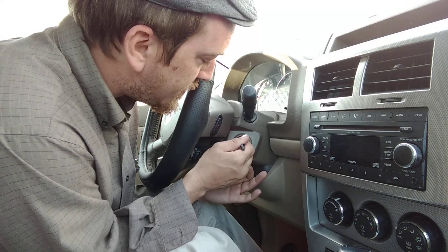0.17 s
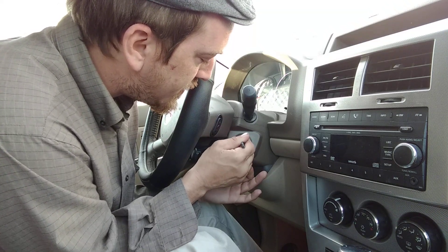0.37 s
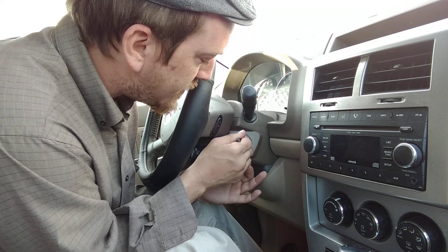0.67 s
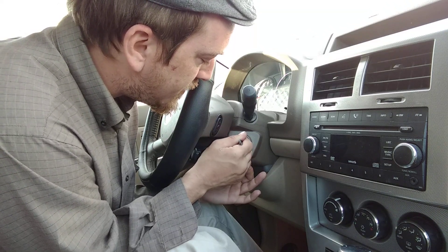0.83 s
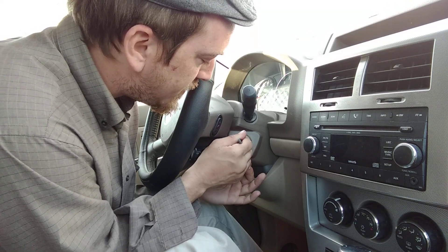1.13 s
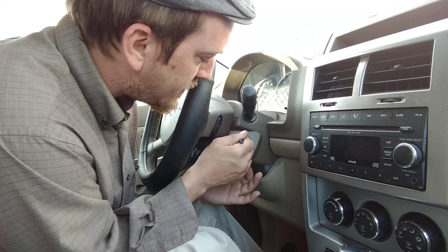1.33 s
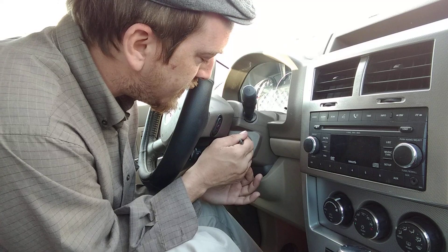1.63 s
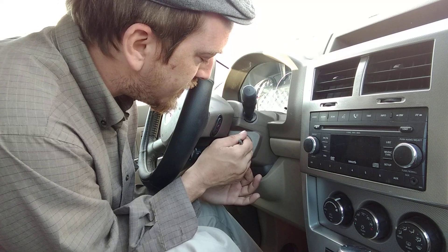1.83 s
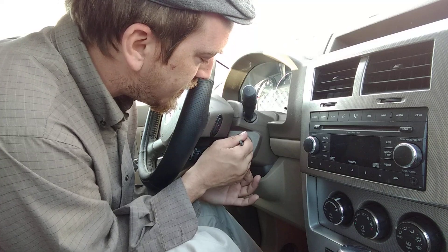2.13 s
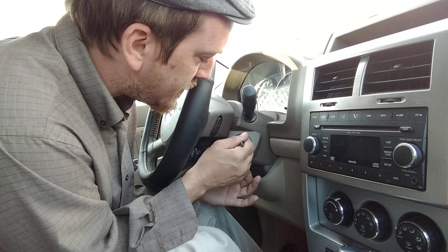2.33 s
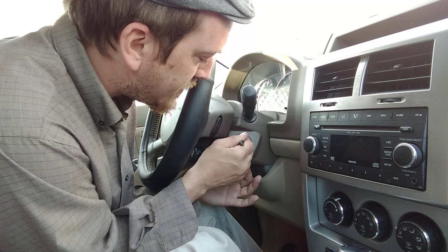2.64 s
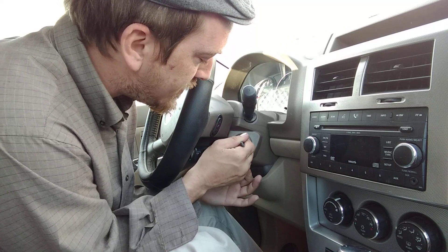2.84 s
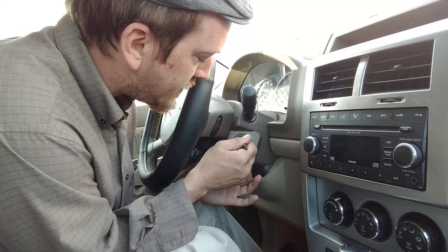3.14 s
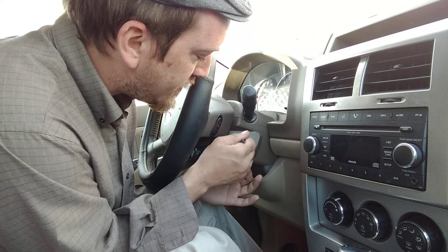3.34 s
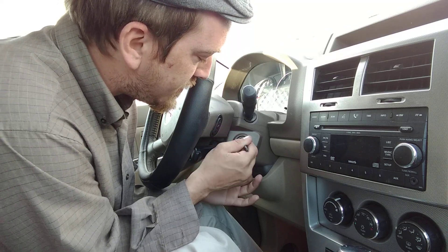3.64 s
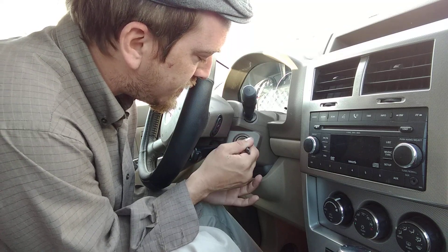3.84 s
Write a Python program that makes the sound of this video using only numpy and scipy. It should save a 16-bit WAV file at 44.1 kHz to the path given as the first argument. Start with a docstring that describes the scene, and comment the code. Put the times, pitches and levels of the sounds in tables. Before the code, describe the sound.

Lock picking: small irregular metallic clicks, ticks and faint scrapes in a quiet parked car

```python
"""In the padded cabin of a parked car, a pick works the lock cylinder on the steering column.
Sprung pins snap back, the thin pick ticks and scrapes on metal, the tension wrench knocks in the keyway:
noise cracks with a rebound and short cabin reflections, ringing through the damped modes of the lock.
The hands nudge the hollow column, whose low modes rumble as filtered noise, over a faint two-channel hiss.
The recorder widens the stereo image with a late, inverted feed between the channels."""
import sys
import numpy as np
from scipy import signal
from scipy.fft import rfft, irfft
from scipy.io import wavfile
from scipy.ndimage import uniform_filter1d

SR = 44100
rng = np.random.default_rng(int(sys.argv[2]) if len(sys.argv) > 2 else 0)


def store_wav(level_fs):
    """Save 16-bit WAV to argv[1]."""
    pcm = np.round(np.clip(np.atleast_2d(level_fs), -1, 1) * 32767)
    wavfile.write(sys.argv[1], SR, pcm.T.astype(np.int16))


N = 176400  # samples: 4 s
CLICK_SIZE = 8192  # samples in one contact with its tail

# colour of the pick on metal, for ticks and scrapes: f/Hz, relative level/dB
PICK_TONE = [(300, -5.5), (1100, -4), (2800, -11.5), (4000, -4), (5200, -8), (6500, 0), (8300, -5.5),
             (9600, -3.5), (11100, -5.5), (13000, 2), (15500, -3.5)]


def undb(db):
    """Turn dB into an amplitude factor."""
    return 10 ** (np.asarray(db) / 20)


def unit(x):
    """Scale to an energy of 1."""
    return x / np.sqrt(np.sum(x ** 2))


def fade(t, t60):
    """Exponential decay that falls 60 dB in t60 seconds."""
    return np.exp(-np.log(1000) * t / t60)


def colour(points, size):
    """Minimum-phase frequency response through (Hz, dB) points: it colours without ringing ahead."""
    hz, db = np.array(points, float).T
    f = np.maximum(np.fft.rfftfreq(size, 1 / SR), 1)
    gain = undb(np.interp(np.log(f), np.log(hz), db))
    # folding the cepstrum onto positive time makes the response causal
    cepstrum = irfft(np.log(gain), size)
    cepstrum[1:size // 2] *= 2
    cepstrum[size // 2 + 1:] = 0
    return np.exp(rfft(cepstrum))


def resonances(modes, size):
    """Summed frequency response of damped modes given as (Hz, t60 s, dB)."""
    f = np.maximum(np.fft.rfftfreq(size, 1 / SR), 1)
    response = 0
    for hz, t60, db in modes:
        q = np.pi * hz * t60 / np.log(1000)
        response = response + undb(db) / (1 + 1j * q * (f / hz - hz / f))
    return response


def noise(response):
    """Noise of rms 1 with the given response."""
    x = irfft(rfft(rng.standard_normal(N)) * response, N)
    return x / x.std()


def hiss():
    """Faint coloured noise with a slowly moving level, unrelated at the two microphones."""
    # spectrum of the hiss: f/Hz, relative density/dB
    hiss_tone = [(25, 6), (45, -1), (70, -3), (170, -1), (300, -7.5), (600, -11), (1300, -16), (2000, -19),
                 (4000, -23), (7000, -30.5), (9000, -34.5), (12000, -29.5), (15500, -24.5)]
    # rms level of the hiss over time: t/s, level/dB
    hiss_level = [(0, -59), (.2, -59), (.3, -58), (.7, -55.5), (.8, -59.5), (1.05, -58.5), (1.25, -55),
                  (1.42, -56.5), (1.5, -57), (1.7, -57), (1.9, -55.5), (2.5, -56), (3.1, -56), (3.7, -56),
                  (4, -56.5)]
    level = undb(np.interp(np.arange(N) / SR, *np.array(hiss_level).T))
    return level * np.array([noise(colour(hiss_tone, N)) for _ in range(2)])


def rumble(modes, rise_s, stretch):
    """Every nudge of the hands sets these modes rumbling for a moment; overlapping nudges add in power."""
    # hands nudging the column: t/s, level before trims/dB, decay time before stretch/s
    nudges = [(0.233, -50.5, 0.067), (.29, -52.5, 0.1), (0.513, -52.5, 0.036), (0.6, -51, 0.021),
              (0.693, -52, 0.02), (1.101, -60, 0.045), (1.242, -56.5, 0.071), (1.437, -55.5, 0.036),
              (1.589, -54.5, 0.027), (1.74, -48.5, 0.045), (1.89, -59, 0.15), (2.016, -51, 0.056),
              (2.185, -54.5, 0.048), (2.32, -57, 0.19), (2.4, -60, 0.023), (2.656, -46.5, 0.04),
              (3.117, -46, 0.086), (3.225, -52.5, 0.084), (3.406, -51, 0.056), (3.69, -58, 0.017),
              (3.811, -45, 0.052), (3.92, -57, 0.091)]
    nudge_trim_db = 6
    t = np.arange(N) / SR
    power = 0
    for start, db, decay in nudges:
        since = np.maximum(t - start, 0)
        swell = (1 - np.exp(-since / rise_s)) * np.exp(-since / (decay * stretch))
        power = power + (undb(db + nudge_trim_db) * swell) ** 2
    x = noise(resonances(modes, N))
    # level the noise over 25 ms so the nudges alone shape it
    running_power = uniform_filter1d(x ** 2, size=1100)
    return np.sqrt(power / running_power) * x


def column():
    """The hollow steering column: two deep modes swell later and last longer than the upper ones."""
    # resonances of the column, deep to high: f/Hz, t60/s, relative level/dB
    column_modes = [(58, 0.32, -13.5), (83.6, 0.25, -4), (131.6, 0.41, 5), (153.2, 0.28, 0),
                    (182.5, 0.39, 7), (348, 0.061, -14.5)]
    deep = rumble(column_modes[:2], rise_s=0.027, stretch=1.27)
    upper = rumble(column_modes[2:], rise_s=0.0034, stretch=0.65)
    return undb(-2.5) * deep + undb(1.5) * upper


def cabin_noise():
    """Dense reflections as noise of scattered strength, with a few strong ones standing out."""
    chatter_db = 5.5
    chance = rng.standard_normal((2, CLICK_SIZE))
    return unit(chance[0] * undb(chatter_db * np.clip(chance[1], -2, 2)))


def lock_ring(size):
    """Frequency response of the lock and its housing: metal modes that share one short decay."""
    # resonances of the lock: f/Hz, level over the broad response before each layer's trim/dB
    lock_modes = [(723, 6), (940, 2), (1075, -7.5), (1147, 7), (1220, 5), (1574, 3), (1711, 0.5),
                  (2375, 10), (2510, 3), (2628, 3), (3175, 5), (3544, -5), (3700, -3), (4300, 3),
                  (5336, -5), (6560, -6.5), (7376, -5), (9665, 0.5), (10480, 9), (11950, -4), (12874, -8),
                  (14446, 6), (15300, -4)]
    t60_s = 0.045
    return resonances([(hz, t60_s, db) for hz, db in lock_modes], size)


def crack():
    """Metal meets metal: a tiny noise burst and one weaker rebound, without their lows."""
    crack_s, rebound_s, rebound_db = 0.0007, 0.0012, -5.5
    t = np.arange(CLICK_SIZE) / SR
    since = np.maximum(t - rebound_s, 0)
    chance = rng.standard_normal((2, CLICK_SIZE))
    first = unit(chance[0] * t * np.exp(-2 * t / crack_s))
    rebound = unit(chance[1] * since * np.exp(-2 * since / crack_s))
    high_pass = signal.butter(1, 1700, "high", fs=SR, output="sos")
    return signal.sosfilt(high_pass, first + undb(rebound_db) * rebound)


def contact(crack_db, cabin):
    """A crack, then cabin reflections: the body holds while dashboard and wheel answer, treble dies first."""
    cabin_t60_s, treble_t60_s, rise_s = 0.068, 0.047, 0.002
    body_split_hz, treble_split_hz = 1400, 7500
    early_s, late_body_db = 0.0105, -6
    shared = 0.55  # share of the reflections' power that stays the same for every contact
    t = np.arange(CLICK_SIZE) / SR
    bright = crack()
    paths = np.sqrt(shared) * cabin + np.sqrt(1 - shared) * cabin_noise()
    body = signal.sosfiltfilt(signal.butter(2, body_split_hz, fs=SR, output="sos"), paths)
    low = signal.sosfiltfilt(signal.butter(2, treble_split_hz, fs=SR, output="sos"), paths)
    middle, treble = low - body, paths - low
    hold = np.where(t < early_s, 1, undb(late_body_db))
    tail = (body * hold + middle) * fade(t, cabin_t60_s) + treble * fade(t, treble_t60_s)
    return undb(crack_db) * bright + unit(tail * (1 - np.exp(-t / rise_s)))


def clicks(rows, tone, cabin, crack_db, level_db, modes_db):
    """Each contact rings the lock, with its own strength in body, ring and treble."""
    # edges of the body, ring and treble bands: f/Hz
    band_edges = [500, 2100, 8700, 16000]
    level_span_s = 0.03  # a band level is the click's energy averaged over this time
    out = np.zeros(N + CLICK_SIZE)
    response = colour(tone, CLICK_SIZE) * (1 + undb(modes_db) * lock_ring(CLICK_SIZE))
    f = np.fft.rfftfreq(CLICK_SIZE, 1 / SR)
    for start, *band_db, sharp_db in rows:
        ring = rfft(contact(sharp_db + crack_db, cabin)) * response
        balance = []
        for lo, hi, db in zip(band_edges, band_edges[1:], band_db):
            energy = 2 * np.sum(abs(ring[(f > lo) & (f < hi)]) ** 2) / CLICK_SIZE
            gain_db = db - 10 * np.log10(energy / (level_span_s * SR))
            # flat inside the band, sloping across its edges
            balance += [(lo * 1.12, gain_db), (hi / 1.12, gain_db)]
        i = int(start * SR)
        out[i:i + CLICK_SIZE] += irfft(ring * colour(balance, CLICK_SIZE))
    return out[:N] * undb(level_db)


def scrape(cabin):
    """The pick drags along the keyway: dense tiny catches swell as it is pressed, then let go."""
    # drags: start t/s, length/s, level at the end of the swell/dB
    drags = [(0.446, 0.093, -60), (0.574, 0.019, -53), (0.628, 0.041, -59), (1.384, 0.026, -54),
             (1.969, 0.042, -55), (2.153, 0.023, -61), (2.603, 0.029, -62), (3.338, 0.064, -53.5)]
    catches_per_s, scatter_db, release_s = 480, 6.5, 0.01
    t = np.arange(N) / SR
    strength = undb(scatter_db * np.clip(rng.standard_normal(N), -2, 2))
    catches = (rng.random(N) < catches_per_s / SR) * strength
    x = signal.fftconvolve(catches, contact(crack_db=-6, cabin=cabin))[:N]
    x = irfft(rfft(x) * colour(PICK_TONE, N) * (1 + lock_ring(N)), N)
    pressure = 0
    for start, length, db in drags:
        end = start + length
        pressure = pressure + undb(db) * np.interp(t, [start, end, end + release_s], [0, 1, 0])
    return pressure * x / x.std()


def wrench_knocks(cabin):
    """The tension wrench knocks in the keyway: dull contacts, weak in treble."""
    # knocks before trims: t/s, body/dB, ring/dB, treble/dB, first crack over its tail/dB
    knocks = [(0.229, -53.5, -63, -70, -6), (0.2465, -64, -65, -62, -1), (0.26, -56, -62, -66, -4),
              (0.2775, -49, -55, -58, -4), (1.1205, -49.5, -53, -66, -9), (1.2227, -43, -53, -64, -5),
              (2.3392, -61, -62, -65, -7), (2.6503, -33.5, -36.5, -51, -8), (3.1094, -53, -63, -59, -6),
              (3.126, -51, -56, -58, -2), (3.141, -53, -65, -67, -2), (3.1583, -51, -62, -68, -3),
              (3.238, -57, -61, -68, -6), (3.577, -55, -63, -80, -11), (3.8105, -48, -54, -50, -4)]
    # colour of a knock: f/Hz, relative level/dB
    knock_tone = [(300, -10), (600, -15), (900, -6), (1200, -1.5), (1700, -8), (2400, -5.5), (3600, -9),
                  (5200, -15.5), (6500, -14.5), (9000, -24), (12000, -21.5), (15500, -15.5)]
    return clicks(knocks, knock_tone, cabin, crack_db=2, level_db=-0.5, modes_db=-3.5)


def pick_ticks(cabin):
    """The thin pick ticks on metal: bright contacts with less of the lock's modes."""
    # ticks before trims: t/s, body/dB, ring/dB, treble/dB, first crack over its tail/dB
    ticks = [(0.2714, -57, -48, -41, 3), (0.5019, -65, -67, -59, -3), (0.653, -61, -62, -58, -4),
             (0.6802, -54, -53, -38, -1), (0.7069, -52, -38, -33.5, 3), (0.7468, -68, -69, -58, -5),
             (1.1152, -57, -53, -45, -2), (1.4127, -53, -42.5, -35, -3), (1.5325, -61, -67, -66, -8),
             (1.8633, -63, -66, -63, -3), (1.8852, -62, -65, -65, -3), (2.0218, -63, -59, -49, 3),
             (2.0314, -46, -39, -38, -1), (2.1771, -60, -61, -57, -4), (2.188, -60, -64, -59, -5),
             (2.3701, -59, -63, -61, -9), (2.5986, -64, -64, -55, -1), (2.6508, -56, -52, -46, 1),
             (3.2595, -58, -62, -58, -3), (3.5524, -61, -64, -61, -3), (3.6901, -64, -68, -66, -6)]
    return clicks(ticks, PICK_TONE, cabin, crack_db=3, level_db=-1.0, modes_db=-5.0)


def pin_snaps(cabin):
    """Sprung pins snap back: contacts that bring out the lock's modes most."""
    # snaps before the crack trim: t/s, body/dB, ring/dB, treble/dB, first crack over its tail/dB
    snaps = [(0.3327, -46, -39, -46, -1), (0.5932, -55, -51, -66, -5), (1.7398, -54, -49.5, -45.5, -2),
             (2.0275, -53, -39, -44, 0), (2.429, -43, -36, -42, -3), (3.2035, -44, -35.5, -41, 0),
             (3.408, -49, -49, -48, -6), (3.8963, -45, -35.5, -41, -1)]
    # colour of a snap: f/Hz, relative level/dB
    snap_tone = [(300, -4), (700, -3), (1100, 0.5), (1900, -8), (2500, -2), (3000, -7), (4700, 0),
                 (5600, -6.5), (6600, -1), (8200, -2), (9200, -15.5), (11000, -14), (13000, -8.5),
                 (15500, -7.5)]
    return clicks(snaps, snap_tone, cabin, crack_db=2, level_db=0, modes_db=-1)


def scene():
    """Lock and column reach mainly the left microphone; the right one hears its own, weaker rumble."""
    lock_right_db, column_right_db = -42, -19
    cabin = cabin_noise()
    lock = scrape(cabin) + wrench_knocks(cabin) + pick_ticks(cabin) + pin_snaps(cabin)
    left = lock + column()
    right = undb(lock_right_db) * lock + undb(column_right_db) * column()
    return np.array([left, right]) + hiss()


def record(dry):
    """Each channel is fed late and inverted into the other to widen the image; deep bass and top are cut."""
    # feed into the other channel: f/Hz, level/dB
    crossfeed = [(100, -8), (1200, -2.5), (4000, -1.97), (8000, -3), (12000, -6.5), (15500, -5.5)]
    crossfeed_s, low_cut_hz, top_hz = 0.0004535, 56.6, 15700
    delay = np.exp(-2j * np.pi * np.fft.rfftfreq(N, 1 / SR) * crossfeed_s)
    # the magnitude alone colours the feed, so the delay stays exact
    feed = irfft(rfft(dry[::-1]) * abs(colour(crossfeed, N)) * delay, N)
    wide = signal.sosfilt(signal.butter(4, low_cut_hz, "high", fs=SR, output="sos"), dry - feed)
    return signal.sosfilt(signal.ellip(8, 0.2, 70, top_hz, fs=SR, output="sos"), wide)


dry = scene()
out = record(dry)
store_wav(out)
```